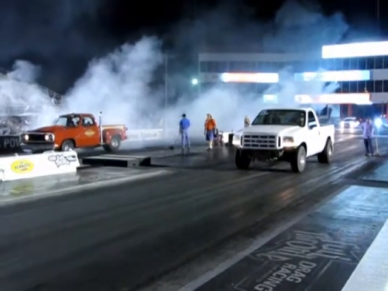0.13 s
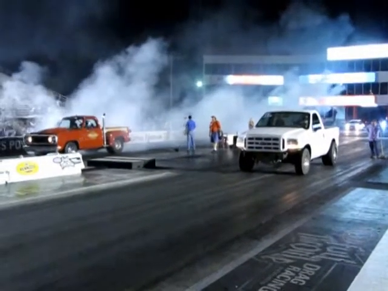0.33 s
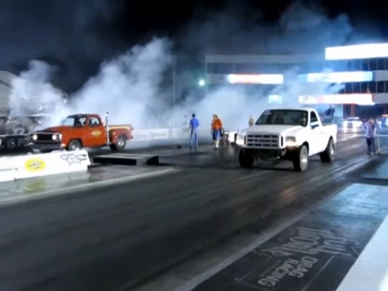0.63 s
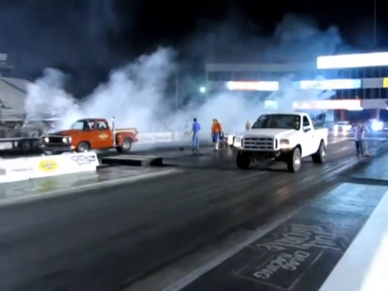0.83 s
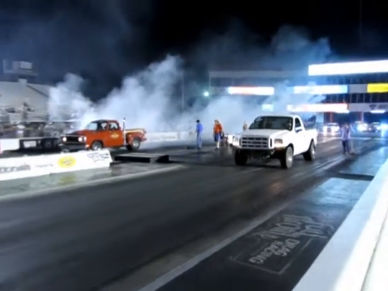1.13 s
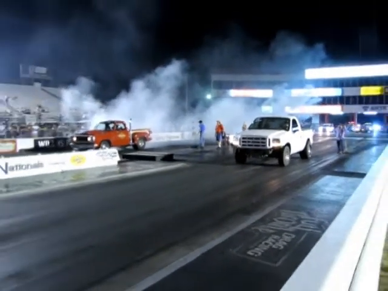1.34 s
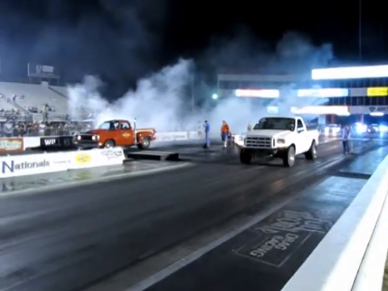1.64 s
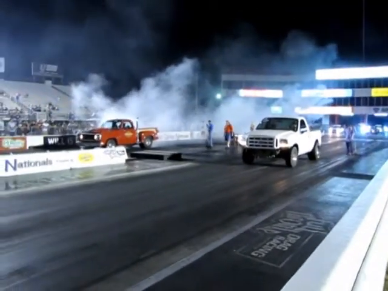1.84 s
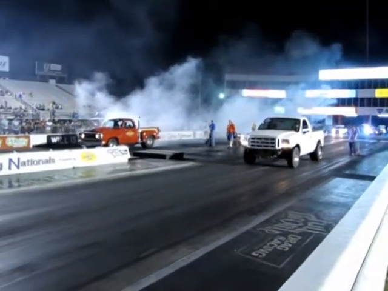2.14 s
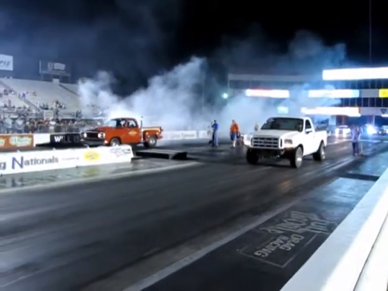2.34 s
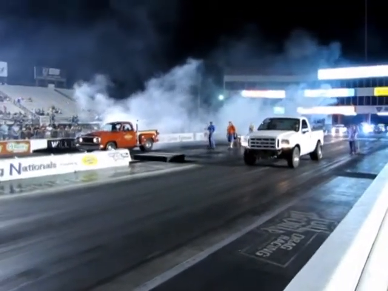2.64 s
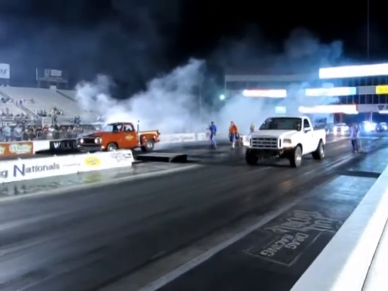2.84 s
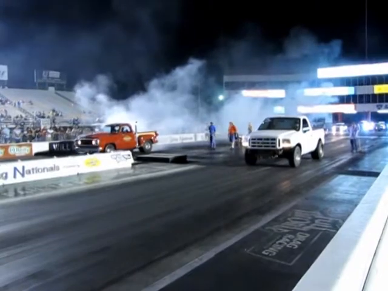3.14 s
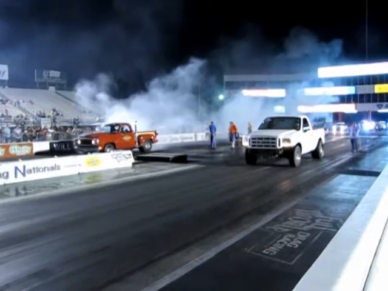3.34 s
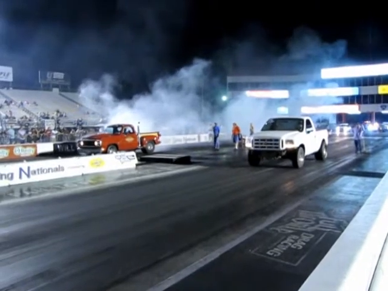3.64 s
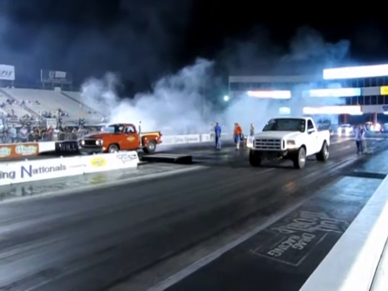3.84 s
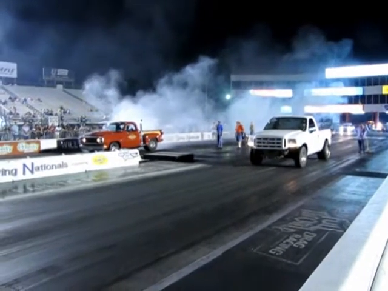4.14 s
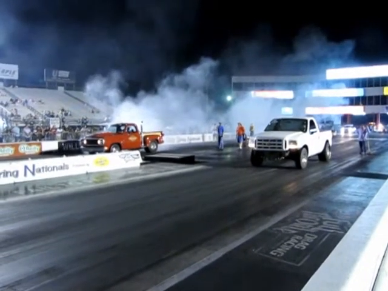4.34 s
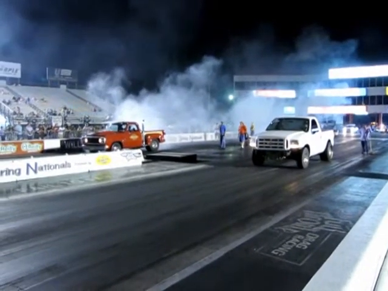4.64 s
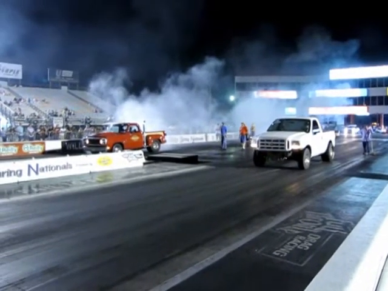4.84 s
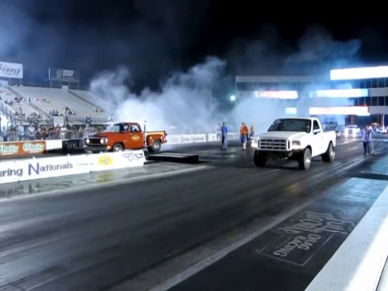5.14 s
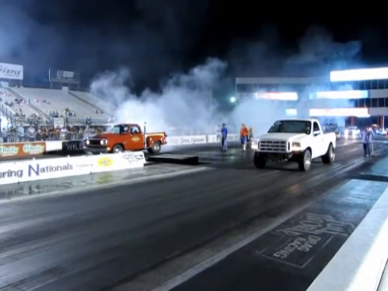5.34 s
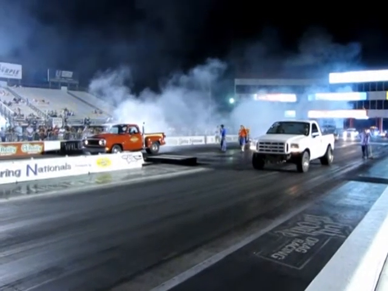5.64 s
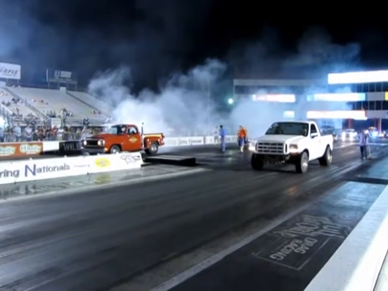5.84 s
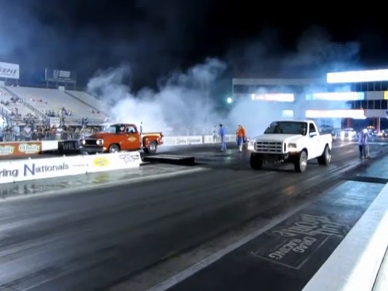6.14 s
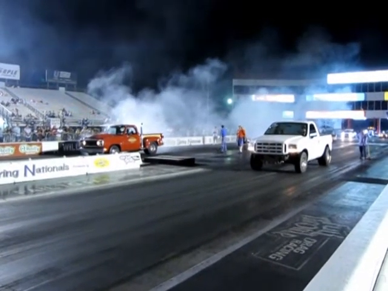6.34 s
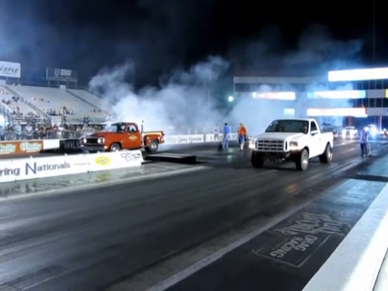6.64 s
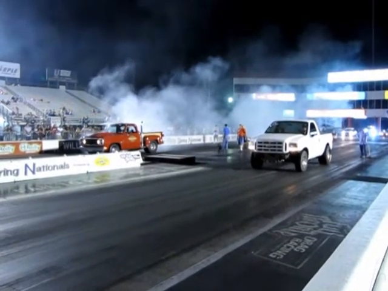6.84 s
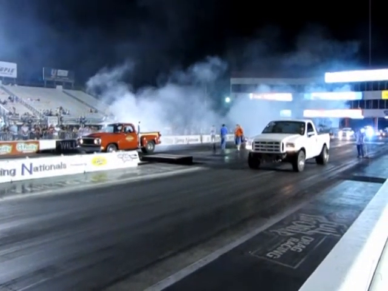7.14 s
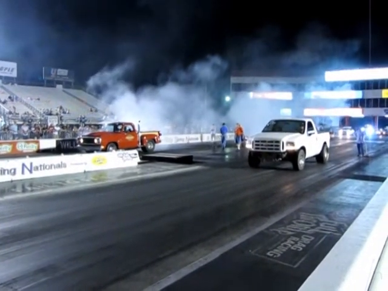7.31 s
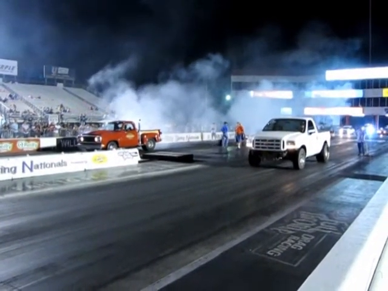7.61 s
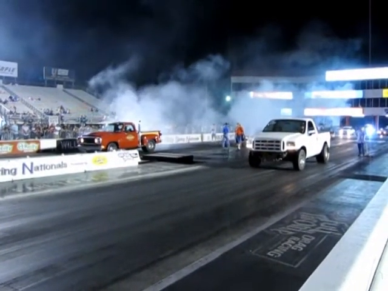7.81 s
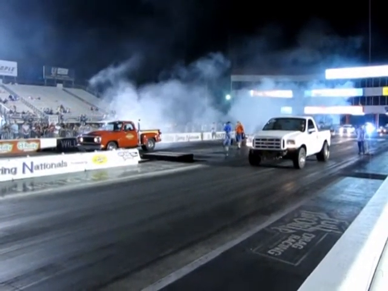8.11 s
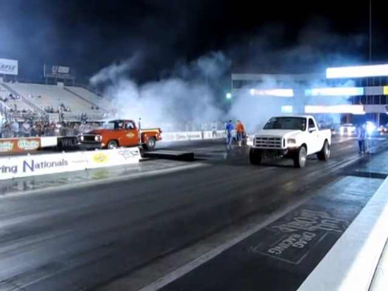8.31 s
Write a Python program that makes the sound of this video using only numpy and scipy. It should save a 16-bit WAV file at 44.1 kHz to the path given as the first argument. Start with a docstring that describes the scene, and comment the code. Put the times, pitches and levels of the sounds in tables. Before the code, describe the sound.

A diesel truck idles with a hard, uneven knock beside another's low throb, sags under load, then both rev to a held roar with climbing turbo whistles.

```python
"""Two diesel pickups at the start line of an open drag strip, heard from the trackside wall.
First the near V8 idles: uneven knocks ring its block over a wash of noise, and the other exhaust throbs.
Early on a brake squeals faintly in three short gliding tones; later the near engine sags under load.
Then both rev up against their brakes: the knocks merge into a roar and the exhaust drones through its
pipe resonances. A brief whine passes while the turbo whistles climb and the intake hisses."""
import sys
import numpy as np
from scipy import signal
from scipy.fft import rfft, irfft, next_fast_len
from scipy.io import wavfile
from scipy.ndimage import uniform_filter1d

SR = 44100
rng = np.random.default_rng(int(sys.argv[2]) if len(sys.argv) > 2 else 0)


def generate_wav(signal):
    """Clip the signal to [-1, 1] and save it as 16-bit WAV at the path in sys.argv[1]."""
    frames = np.transpose(np.atleast_2d(signal))
    scaled = np.clip(frames, -1, 1) * 32767
    pcm = np.round(scaled).astype(np.int16)
    wavfile.write(sys.argv[1], SR, pcm)


N = 373527
T = np.arange(N) / SR  # time in s

# In all tables, t is time and f is frequency.
# Shape of the low rumble of the pits and the track: f/Hz, relative level per Hz/dB
TRACK_SPECTRUM = [(20, -48), (30, -27), (42, -2.5), (75, 3), (115, -3), (190, 0.5), (300, -30), (1000, -73)]
# Gliding tones of the squealing brake: start t/s, length/s, start f/Hz, end f/Hz, level/dB
BRAKE_GLIDES = [(.6, 0.3, 1380, 1318, -29.5), (.93, 0.34, 1312, 1290, -29),
                (1.24, 0.394, 1252, 1290, -32.5)]
# Brief whine that rises and falls back: t/s, f/Hz, level/dB
WHINE_CURVE = [(5.92, 1130, -90), (5.98, 1148, -28), (6.1, 1182, -29), (6.23, 1213, -24.5),
               (6.36, 1162, -28), (6.46, 1140, -90)]
# Exhaust tones of the other truck: multiple of its firing rate, level/dB
FAR_EXHAUST_TONES = [(2, -44.5), (3, -42), (4, -46.5), (6, -50), (8, -47), (10, -53.5)]
# Far turbo's climbing whistle: t/s, f/Hz
FAR_TURBO_PITCH = [(6, 2800), (6.55, 4450), (7, 5950), (7.45, 6950), (7.8, 7550), (8.47, 8500)]
# Strength of that whistle: t/s, level/dB
FAR_TURBO_LEVEL = [(5.9, -90), (6.25, -41), (6.55, -35.5), (6.7, -44), (7, -35.5), (7.35, -40),
                   (7.72, -31.5), (7.92, -43), (8.47, -52)]
# Near turbo's climbing blade tone: t/s, f/Hz
NEAR_TURBO_PITCH = [(6, 1750), (6.7, 3090), (7, 3660), (7.2, 4000), (7.48, 4374), (7.8, 4700), (7.96, 4910),
                    (8.2, 5085), (8.47, 5230)]
# Strength of that blade tone: t/s, level/dB
NEAR_BLADE_LEVEL = [(6, -70), (6.7, -34), (6.9, -34), (7, -28.5), (7.3, -33.5), (7.8, -34), (8, -28),
                    (8.33, -28), (8.45, -23)]
# Swells of the near turbo's shaft tone: middle t/s, half-width (where the gain is 1/e)/s, level/dB
SHAFT_TONE_SWELLS = [(6.96, .07, -28), (7.15, .085, -18.5), (7.45, .1, -26)]
# Breathy whistle of the intake: t/s, f/Hz, level/dB
INTAKE_CURVE = [(5, 5400, -75), (5.35, 5450, -46), (5.62, 5460, -43), (5.8, 5195, -38), (6.05, 5320, -33),
                (6.4, 5390, -33), (6.8, 5460, -34), (7.1, 5400, -39), (8.47, 5410, -32)]
# Shape of the intake's hiss: f/Hz, relative level per Hz/dB
HISS_SPECTRUM = [(1500, -7.5), (3100, 4.5), (4100, -1.5), (5400, -4), (7200, -6.5), (8600, -12),
                 (10500, -27.5), (14000, -29.5), (16000, -36)]
# Shape of the turbulent exhaust gas: f/Hz, relative level per Hz/dB
RUMBLE_SPECTRUM = [(30, -44), (55, -22), (80, -3), (110, 2), (170, -3), (260, -1.5), (400, -5), (600, -2),
                   (1000, -36), (3000, -70)]
# Exhaust tones, the fractions from unevenly firing banks: multiple of firing rate, relative level/dB
EXHAUST_TONES = [(.75, -13), (1, 1), (1.25, -14), (1.5, -2), (1.75, -5.5), (2, -4), (2.25, -2.5),
                 (2.75, -10.5), (3, -7), (4, -10.5), (5, -14.5)]
# Exhaust pipe resonances: f/Hz, width/Hz, gain at the peak/dB
PIPE_RESONANCES = [(93, 16, -11), (118, 20, -6.5), (184.4, 5, -4), (232.3, 7.7, 0), (292.4, 8.5, 1.5),
                   (338.4, 13, -5), (487, 24, -11), (602, 40, 2.5)]
# Idle speed, which hunts slightly: t/s, firing rate/(firings per s)
IDLE_SPEED = [(0, 45.08), (1, 45.25), (1.4, 44.8), (2.5, 44.9), (3, 45.3), (3.6, 45), (4.2, 45.4),
              (5, 45.02)]
# Knock of each cylinder in firing order: relative level/dB, delay of its crack/s
CYLINDER_KNOCKS = [(4.5, .0065), (4.5, .0045), (1.5, .003), (4.5, 0.00269), (4, 0.0011), (4.5, .005),
                   (3, .003), (3.5, 0.0011)]
# Shape of knocks and gear wash together: f/Hz, relative level per Hz/dB
CLATTER_SPECTRUM = [(25, -24), (200, -12.5), (450, -11), (700, 2), (850, 1.5), (1020, -3.5), (1500, 0.5),
                    (1900, 0.5), (2350, 0), (2750, 0), (3100, -9.5), (3600, -13.5), (5200, -16.5),
                    (7300, -22), (8600, -31.5), (10500, -40.5), (14000, -54)]
# Rings of the block and covers: f/Hz, width of each of two stages/Hz, level against boom or clatter/dB
BLOCK_RINGS = [(701, 47, -16.5), (779, 46, -7.5), (814, 44, -6.5), (1285, 26, -16), (1514.5, 42, -15.5),
               (1860, 39, -17), (2111, 64, -13.5), (2622, 48, -16)]
# Injector ticks: place in the cycle/firings, f/Hz, width of each of two stages/Hz, level against clatter/dB
INJECTOR_TICKS = [(.2, 1760, 200, -18), (.2, 4440, 200, -37), (1.05, 7450, 260, -33),
                  (1.1, 4610, 150, -30.5), (1.1, 5300, 190, -33), (1.95, 2110, 130, -14),
                  (2.15, 1280, 110, -21), (3, 4350, 150, -29), (3.95, 2700, 150, -21), (4, 680, 90, -21),
                  (5.1, 1900, 160, -18), (5.12, 2660, 140, -11.5), (5.25, 7720, 240, -41),
                  (5.95, 3820, 190, -24), (5.9, 2690, 150, -15), (6.1, 2160, 140, -15.5),
                  (7, 7100, 300, -34), (7.9, 7250, 300, -37)]
# Microphone pair: f/Hz, side against middle level/dB
STEREO_WIDTH = [(30, -10), (100, -27.5), (270, -22), (740, -17.5), (1210, -11.5), (2010, -8), (3310, -4.5),
                (5470, 2), (9000, 5), (14000, 12)]
# Balance of the pair: f/Hz, left against right level/dB
STEREO_LEAN = [(500, 0), (1100, 0.5), (2200, -3), (4000, 0.5), (9000, -1.5)]

# Background
TRACK_DB = -36
HUM_HZ, HUM_START_DB = 418.4, -41
HUM_FADE_S, HUM_FADE_DB = 2.7, 5  # middle of the fade, total drop
FAR_IDLE_HZ = 38.15  # average firings per s

# Turbos and intake
BOOST_S, BOOST_WIDTH_S = 5.87, 0.12  # the rush of air comes in
BLADES = 6  # on the near turbo
RUSH_DB = -41
HISS_TOP_SPEED_DB = -20.5

# Near engine speed in firings per s; every width belongs to a smooth curve
START_FIRINGS = 1.9  # crank position at the start
RUN_UP_HZ, CREEP_HZ_PER_S = 59.3, 8.7
RUN_UP_S, RUN_UP_WIDTH_S = 6.0174, .2343
SAG_HZ, SAG_S, SAG_WIDTH_S = 5.669, 5.456, .3595
THROTTLE_S, THROTTLE_WIDTH_S = 5.79, 0.18  # half open, gentleness of opening

# Layer levels: (dB at idle, dB at full throttle)
CLATTER_DB = (-21.5, -12)
BOOM_DB = (-24.5, -13.5)  # before it eases late in the run-up
RUMBLE_DB = (-33.5, -25.5)

# Exhaust drone: base levels before and after it sets in, then two further gains
DRONE_DB = (-44, -23)
DRONE_S, DRONE_WIDTH_S = 5.62, 0.08
DRONE_GROWTH_DB_PER_S, DRONE_BOOST_DB = 1.5, 3.5

# Knocks
CYLINDERS = len(CYLINDER_KNOCKS)
SCATTER_S = .00007  # spread of the ignition timing
KNOCK_ATTACK_S, RATTLE_S, TAIL_DB, TAIL_S = .002, .014, -9, .03  # swell, rattle, weak tail
CRACK_DB, CRACK_S = -6, .001
GEARS_DB = -1.5  # gear wash against the knocks, before shaping
BOOM_EASE_DB, BOOM_EASE_S = 4.5, 7.8
LOPE_DB, ACCENT_LOSS = 13.2, 0.55  # first cylinder's accent at idle, share lost at full throttle
BOOM_LAG_S = .003  # average delay of the block's rings
BLOCK_SCATTER_S = .0008  # extra timing spread of the rings at full throttle
TICK_RATTLE_DB = -6  # rattle against clean strike, before ringing
TICK_LOAD_DB = -6.5  # change against the clatter at full throttle
DULL_S, DULL_HZ, DULL_WIDTH_HZ, DULL_SHARE = 5.63, 4470, 1400, 0.68  # upper ring lost under load


def from_db(db):
    """Turn decibels into a gain."""
    return 10 ** (np.asarray(db) / 20)


def rms_one(x):
    """Scale to an average strength (rms) of 1."""
    return x / np.sqrt(np.mean(x ** 2) + 1e-20)


def rise(middle_s, width_s):
    """Make an S-curve in time from 0 to 1."""
    return (1 + np.tanh((T - middle_s) / (2 * width_s))) / 2


def hump(middle_s, width_s):
    """Make a bell in time: 0 up to 1 and back."""
    return np.exp(-((T - middle_s) / width_s) ** 2)


def curve(rows):
    """Join the points of a speed, pitch or level with straight lines in time."""
    return np.interp(T, *np.transpose(rows))


def level(range_db, amount):
    """Move between two dB values as the amount goes from 0 to 1."""
    low_db, high_db = range_db
    return low_db + (high_db - low_db) * amount


def colour(x, spectrum):
    """Filter by a smooth curve of level against frequency."""
    hz, db = np.transpose(spectrum)
    size = next_fast_len(N + SR // 10)
    log_hz = np.log(np.maximum(np.fft.rfftfreq(size, 1 / SR), 1))
    gain = from_db(np.interp(log_hz, np.log(hz), db))
    return irfft(rfft(x, size) * gain, size)[:N]


def drift(rate_hz):
    """Wander randomly with rms 1, drawn at every 20th sample and joined up."""
    r = np.exp(-40 * np.pi * rate_hz / SR)
    noise = rng.standard_normal(N // 20 + 2002)
    slow = signal.lfilter([1], [1, -2 * r, r * r], noise)[2000:]  # skip the filter's start
    return np.interp(np.arange(N) / 20, np.arange(len(slow)), rms_one(slow))


def resonate(x, hz, width_hz):
    """Ring like one resonant part, with gain 1 at its peak."""
    r = np.exp(-np.pi * width_hz / SR)
    feed = np.array([1, 0, -1]) * (1 - r * r) / 2
    feedback = [1, -2 * r * np.cos(2 * np.pi * hz / SR), r * r]
    return signal.lfilter(feed, feedback, x + 1e-18)


def whistle(hz, wobble, wobble_hz, flutter_db):
    """Make a tone whose pitch and strength flutter at random; rms 1."""
    phase = 2 * np.pi * np.cumsum(hz * (1 + wobble * drift(wobble_hz))) / SR
    return rms_one(np.sin(phase) * from_db(flutter_db * drift(29)))


def sung(rows, wobble, wobble_hz, flutter_db):
    """Let a whistle follow a curve of pitch and level."""
    s, hz, db = np.transpose(rows)
    tone = whistle(np.interp(T, s, hz), wobble, wobble_hz, flutter_db)
    return from_db(np.interp(T, s, db)) * tone


def track_rumble():
    """Low noise of the pits and the track."""
    return from_db(TRACK_DB) * rms_one(colour(rng.standard_normal(N), TRACK_SPECTRUM))


def background_hum():
    """A faint, slightly unsteady tone that recedes."""
    hum_db = HUM_START_DB - HUM_FADE_DB * rise(HUM_FADE_S, width_s=.2)
    return from_db(hum_db) * whistle(HUM_HZ, wobble=.008, wobble_hz=15, flutter_db=2.5)


def brake_squeal():
    """Brake tones fade in, slide evenly in pitch and fade out."""
    out = 0
    for s, length_s, start_hz, end_hz, db in BRAKE_GLIDES:
        hz = np.interp(T, [s, s + length_s], [start_hz, end_hz])
        envelope = rise(s, width_s=.017) * (1 - rise(s + length_s, width_s=.017))
        tone = whistle(hz, wobble=.0014, wobble_hz=40, flutter_db=1.5)
        out = out + from_db(db) * envelope * tone
    return out


def brief_whine():
    """A single tone that rises in pitch and falls back."""
    return sung(WHINE_CURVE, wobble=.003, wobble_hz=60, flutter_db=1)


def far_idle(throttle):
    """The other exhaust throbs at its own pace, fading out as both trucks rev up."""
    crank = np.cumsum(FAR_IDLE_HZ * (1 + .005 * drift(2))) / SR
    tones = 0
    for multiple, db in FAR_EXHAUST_TONES:
        tones = tones + from_db(db) * np.sin(2 * np.pi * (multiple * crank + rng.random()))
    return np.sqrt(2) * tones * (1 - throttle)


def far_turbo():
    """The other turbo's climbing whistle is breathy because its pitch jitters quickly."""
    tone = whistle(curve(FAR_TURBO_PITCH), wobble=.021, wobble_hz=300, flutter_db=2)
    return from_db(curve(FAR_TURBO_LEVEL)) * tone


def near_turbo():
    """The turbo hums once per turn and whistles once per blade in a rush of air."""
    blade_hz = curve(NEAR_TURBO_PITCH)
    blade_tone = whistle(blade_hz, wobble=.0018, wobble_hz=60, flutter_db=2.5)
    blades = from_db(curve(NEAR_BLADE_LEVEL)) * blade_tone
    air = whistle(blade_hz, wobble=.07, wobble_hz=400, flutter_db=3)
    rush = from_db(RUSH_DB) * rise(BOOST_S, BOOST_WIDTH_S) * air
    shaft_gain = sum(from_db(db) * hump(s, width_s) for s, width_s, db in SHAFT_TONE_SWELLS)
    shaft = shaft_gain * whistle(blade_hz / BLADES, wobble=.01, wobble_hz=60, flutter_db=2)
    return blades + rush + shaft


def intake(speed):
    """Air drawn in makes an uneven, breathy whistle and a hiss that grows with engine speed."""
    load = (speed - speed.min()) / np.ptp(speed)
    noise = rms_one(colour(rng.standard_normal(N), HISS_SPECTRUM))
    hiss = from_db(HISS_TOP_SPEED_DB) * load ** 2 * noise
    return hiss + sung(INTAKE_CURVE, wobble=.036, wobble_hz=400, flutter_db=2.5)


def rumble(crank, throb=0.12):
    """Turbulent exhaust gas leaves in puffs, one per firing."""
    puffs = 1 + throb * np.cos(2 * np.pi * crank)
    return rms_one(colour(rng.standard_normal(N) * puffs, RUMBLE_SPECTRUM))


def drone(crank, speed):
    """Each exhaust tone swells when the changing speed carries it through a pipe resonance."""
    out = 0
    for multiple, db in EXHAUST_TONES:
        power = 0
        for hz, width_hz, peak_db in PIPE_RESONANCES:
            offset = 2 * (multiple * speed - hz) / width_hz
            power = power + from_db(peak_db) ** 2 / (1 + offset ** 2)
        phase = 2 * np.pi * (multiple * crank + rng.random()) + .12 * drift(5.8)
        out = out + np.sqrt(2 * power) * from_db(db + drift(5)) * np.sin(phase)
    return out


def exhaust(crank, speed, throttle):
    """The rumble follows the throttle; the drone sets in just before and keeps growing with boost."""
    drone_db = level(DRONE_DB, rise(DRONE_S, DRONE_WIDTH_S))
    drone_db = drone_db + DRONE_GROWTH_DB_PER_S * np.maximum(T - BOOST_S, 0)
    drone_db = drone_db + DRONE_BOOST_DB * rise(6.3, width_s=.12)
    tones = from_db(drone_db) * drone(crank, speed)
    return tones + from_db(level(RUMBLE_DB, throttle)) * rumble(crank)


def engine_speed():
    """Firings per second: idle, a sag as it takes up load, the run-up and a steady creep."""
    gained_hz = RUN_UP_HZ + CREEP_HZ_PER_S * (T - RUN_UP_S)
    gained_hz = gained_hz * rise(RUN_UP_S, RUN_UP_WIDTH_S)
    return curve(IDLE_SPEED) - SAG_HZ * hump(SAG_S, SAG_WIDTH_S) + gained_hz


def firings(crank):
    """Find the sample and cylinder of each firing; ignition comes a little early or late."""
    at = np.flatnonzero(np.diff(np.floor(crank)) > 0) + 1
    cylinder = crank[at].astype(int) % CYLINDERS
    shift = (SCATTER_S * SR * rng.standard_normal(len(at))).astype(int)
    return np.clip(at + shift, 0, N - 1), cylinder


def blows(at, db, uneven_db):
    """Place clicks of uneven strength."""
    clicks = np.zeros(N)
    clicks[at] = from_db(db + uneven_db * rng.standard_normal(len(at)))
    return clicks


def evened(x):
    """Hold the rms near 1 over a few engine cycles, however fast the knocks come."""
    power = uniform_filter1d(uniform_filter1d(x * x, size=15670), size=7835)
    return x / np.sqrt(np.maximum(power, 1e-20))


def grain(envelope):
    """One dense ring of many metal parts: noise of even colour that follows the envelope."""
    burst = rfft(envelope * rng.standard_normal(len(envelope)), 2 * len(envelope))
    even_burst = irfft(burst / (np.abs(burst) + 1e-12))[:len(envelope)]
    fade_in = 1 - np.exp(-T[:len(envelope)] / .001)
    return fade_in * even_burst


def clatter(at, cylinder):
    """Each cylinder repeats its own rattle and sharp crack, over the wash of the gear train."""
    t, knocks = T[:SR // 12], 0
    fading = np.exp(-t / RATTLE_S) + from_db(TAIL_DB) * np.exp(-t / TAIL_S)
    rattle = (1 - np.exp(-t / KNOCK_ATTACK_S)) * fading
    for k, (db, delay_s) in enumerate(CYLINDER_KNOCKS):
        crack = from_db(CRACK_DB) * (t >= delay_s) * np.exp(-np.abs(t - delay_s) / CRACK_S)
        clicks = blows(at[cylinder == k], db, uneven_db=1.0)
        knocks = knocks + signal.oaconvolve(clicks, grain(rattle + crack))[:N]
    gears = from_db(GEARS_DB) * rng.standard_normal(N)
    return rms_one(colour(evened(knocks) + gears, CLATTER_SPECTRUM))


def block(at, cylinder, throttle, boom_db, clatter_db):
    """Firings ring coupled panels, which swell then fade; one cylinder booms harder, less under load."""
    out = 0
    lope_db = LOPE_DB * (1 - ACCENT_LOSS * throttle[at]) * (cylinder == 0)
    spread_s = SCATTER_S + BLOCK_SCATTER_S * throttle[at]  # struck less evenly under load
    for k, (hz, width_hz, db) in enumerate(BLOCK_RINGS):
        lag_s = BOOM_LAG_S + spread_s * rng.standard_normal(len(at))
        late = np.clip(at + (lag_s * SR).astype(int), 0, N - 1)
        clicks = blows(late, lope_db * (k in (1, 2)), uneven_db=.8)  # two rings carry the accent
        ring = evened(resonate(resonate(clicks, hz, width_hz), hz, width_hz))
        layer_db = boom_db if k <= 2 else clatter_db  # the lowest three boom
        out = out + ring * from_db(db + layer_db)
    return out


def injectors(crank, rattle_s=0.018):
    """Injectors tick once per engine cycle, each with a clean ring and its own brief rattle."""
    out = 0
    for place, hz, width_hz, db in INJECTOR_TICKS:
        at, _ = firings((crank - place) / CYLINDERS)
        clicks = blows(at, 0, uneven_db=.8)
        rattle = signal.oaconvolve(clicks, grain(np.exp(-T[:SR // 25] / rattle_s)))[:N]
        strike = rms_one(clicks) + from_db(TICK_RATTLE_DB) * rms_one(rattle)
        ring = resonate(resonate(strike, hz, width_hz), hz, width_hz)
        out = out + from_db(db) * rms_one(ring)
    return out


def engine(crank, throttle):
    """Knocks are heard directly and through the ringing block, with ticks; all dull under load."""
    at, cylinder = firings(crank)
    clatter_db = level(CLATTER_DB, throttle)
    boom_db = level(BOOM_DB, throttle) - BOOM_EASE_DB * rise(BOOM_EASE_S, width_s=0.046)
    out = from_db(clatter_db) * clatter(at, cylinder)
    out = out + block(at, cylinder, throttle, boom_db, clatter_db)
    out = out + from_db(clatter_db + TICK_LOAD_DB * throttle) * injectors(crank)
    lost = DULL_SHARE * rise(DULL_S, width_s=0.21) * resonate(out, DULL_HZ, DULL_WIDTH_HZ)
    return out - lost


def microphones(x, direct, scatter_s):
    """Two close ports differ by the direct wave's slope and sound scattered by walls and stands."""
    t = T[:SR // 5]
    echoes = rng.standard_normal(len(t)) * np.exp(-t / scatter_s) * (t > .004)
    scattered = signal.fftconvolve(x, echoes / np.linalg.norm(echoes))[:N]
    slope = np.imag(signal.hilbert(x, next_fast_len(N)))[:N]  # a quarter-wave shift
    side = colour(np.sqrt(direct) * slope + np.sqrt(1 - direct) * scattered, STEREO_WIDTH)
    channels = []
    for sign in (1, -1):  # left, right
        lean = [(hz, sign * db / 2) for hz, db in STEREO_LEAN]
        channels.append(colour(x + sign * side, lean))
    return np.array(channels)


def scene():
    """Engine speed times the near knocks and exhaust; the throttle sets their strength."""
    speed = engine_speed()
    crank = START_FIRINGS + np.cumsum(speed) / SR  # counted in firings
    throttle = rise(THROTTLE_S, THROTTLE_WIDTH_S)
    surroundings = track_rumble() + background_hum() + brake_squeal() + brief_whine()
    far_truck = far_idle(throttle) + far_turbo()
    near_truck = near_turbo() + intake(speed) + exhaust(crank, speed, throttle) + engine(crank, throttle)
    return microphones(surroundings + far_truck + near_truck, direct=.5, scatter_s=.035)


def record(dry):
    """Flatten the loudest peaks near full scale and cut the top of the treble."""
    limited = dry / (1 + dry ** 12) ** (1 / 12)
    low_pass = signal.cheby2(14, 60, 15300, fs=SR, output="sos")  # 60 dB down from 15300 Hz up
    return signal.sosfilt(low_pass, limited)


dry = scene()
out = record(dry)
generate_wav(out)
```